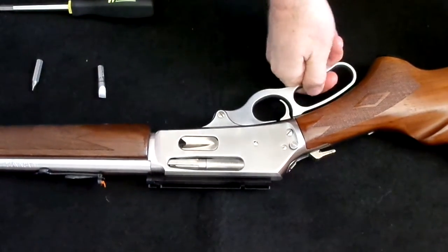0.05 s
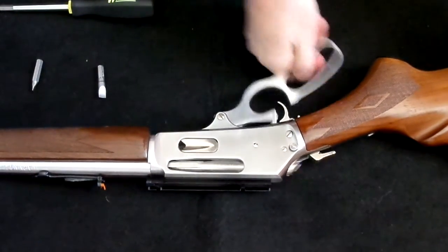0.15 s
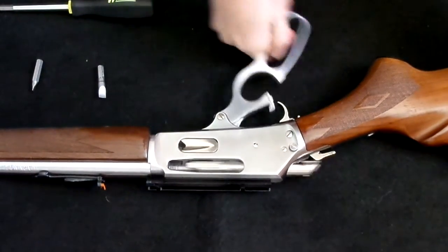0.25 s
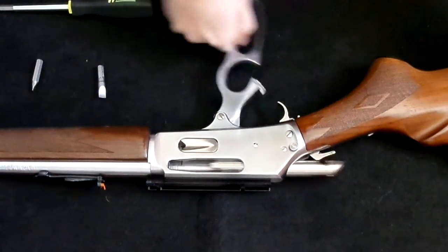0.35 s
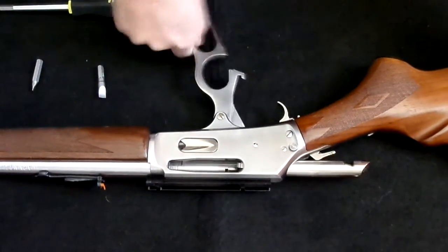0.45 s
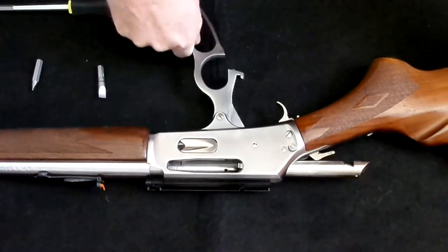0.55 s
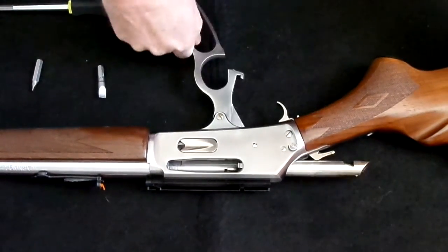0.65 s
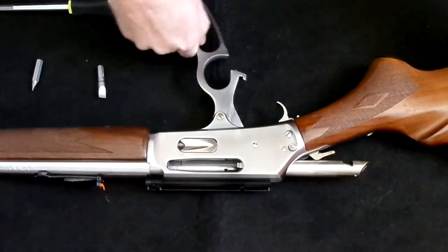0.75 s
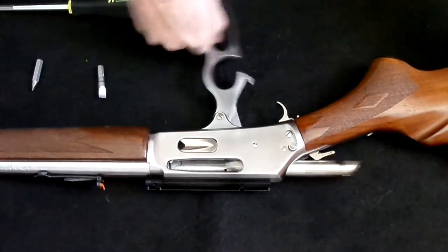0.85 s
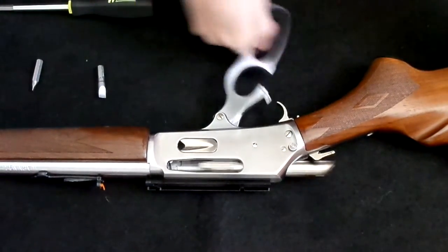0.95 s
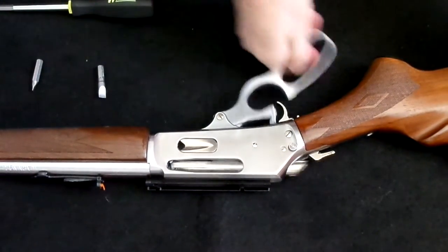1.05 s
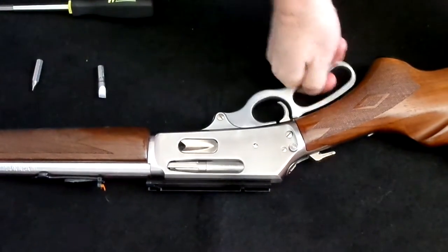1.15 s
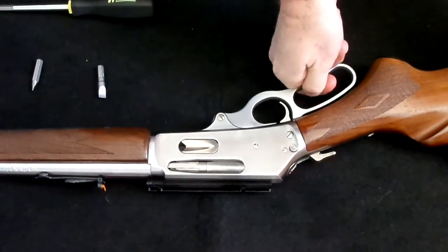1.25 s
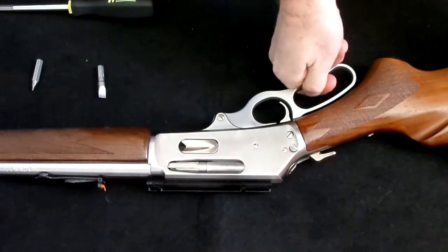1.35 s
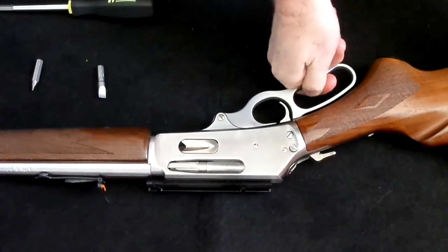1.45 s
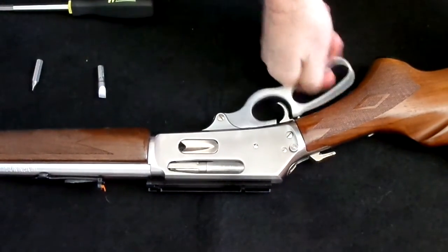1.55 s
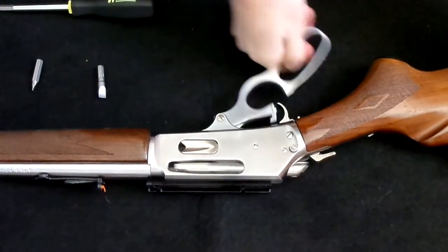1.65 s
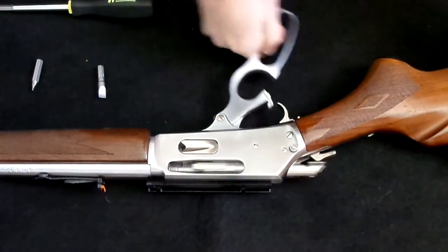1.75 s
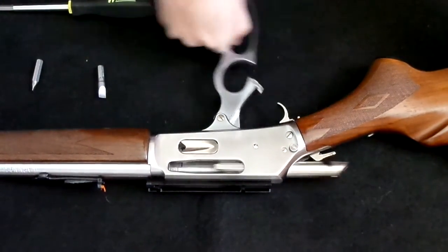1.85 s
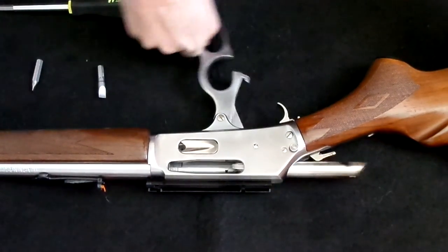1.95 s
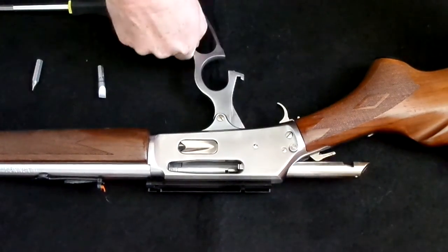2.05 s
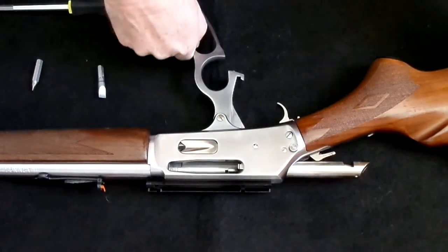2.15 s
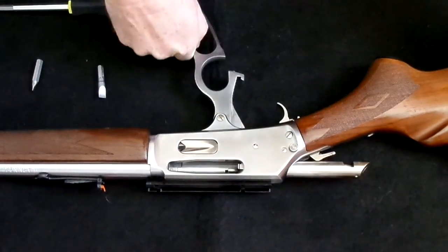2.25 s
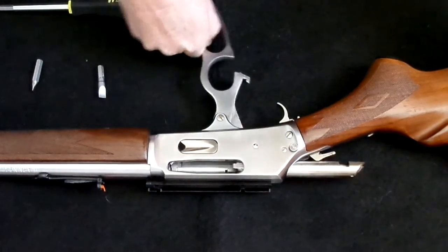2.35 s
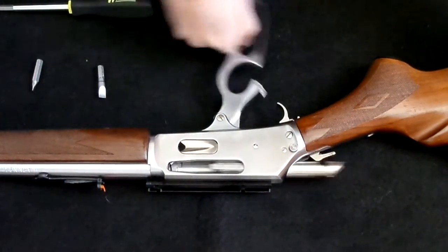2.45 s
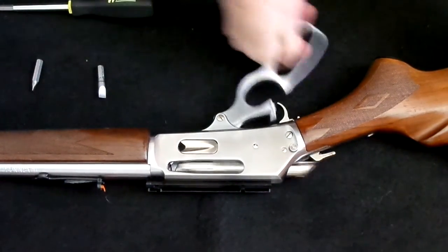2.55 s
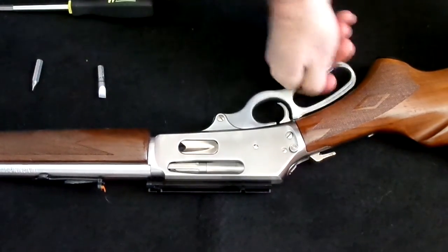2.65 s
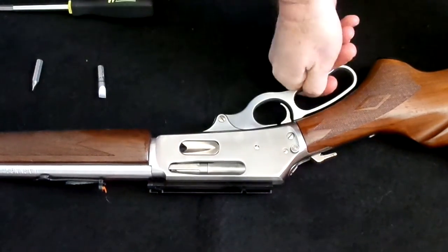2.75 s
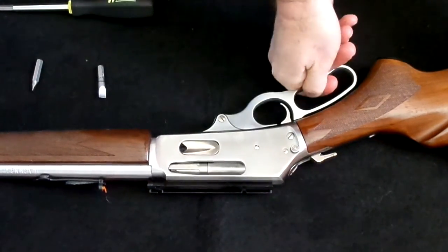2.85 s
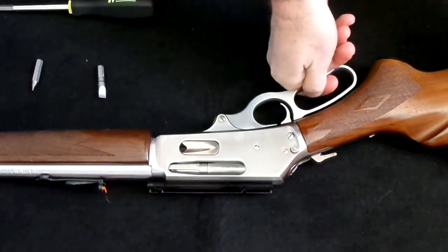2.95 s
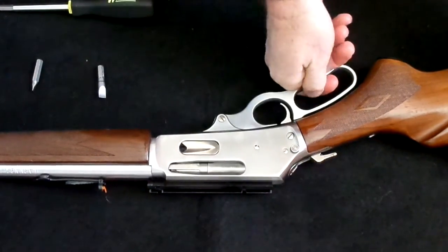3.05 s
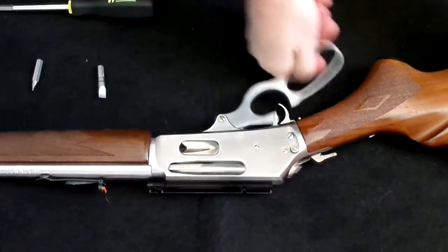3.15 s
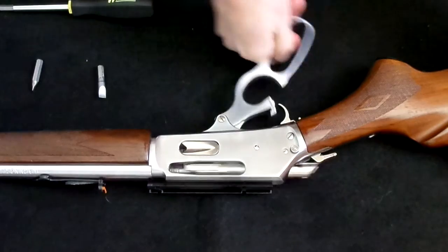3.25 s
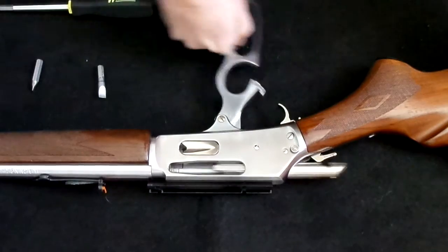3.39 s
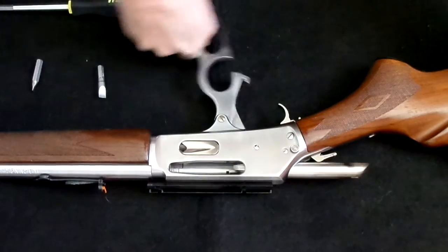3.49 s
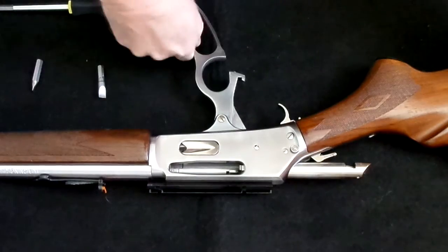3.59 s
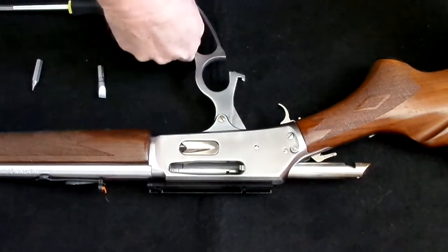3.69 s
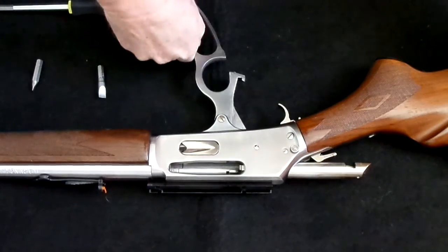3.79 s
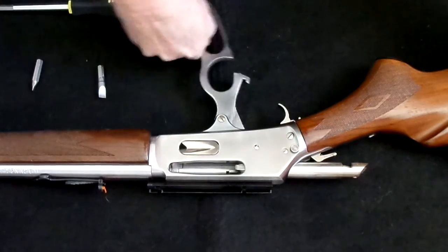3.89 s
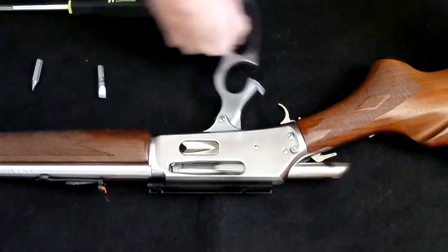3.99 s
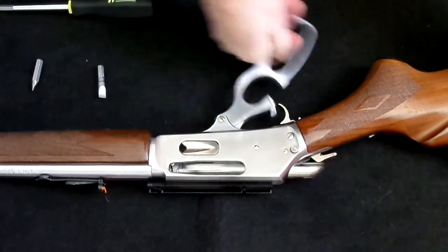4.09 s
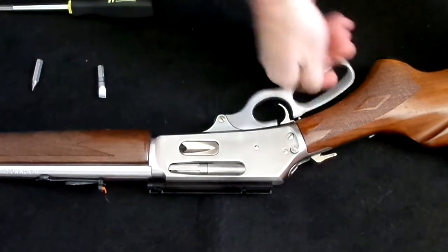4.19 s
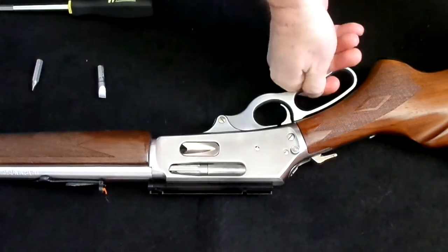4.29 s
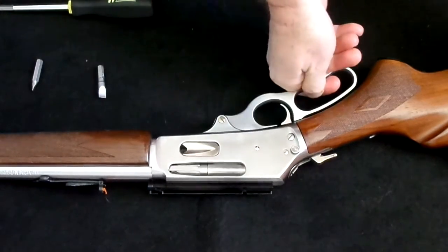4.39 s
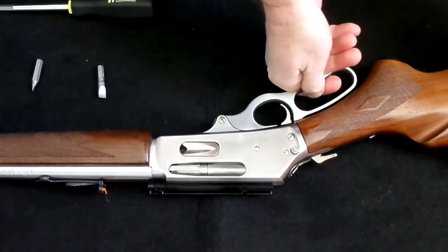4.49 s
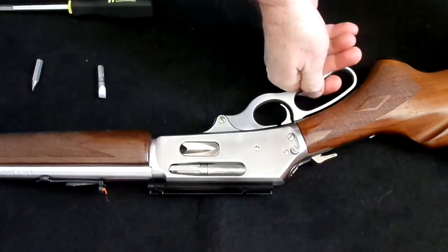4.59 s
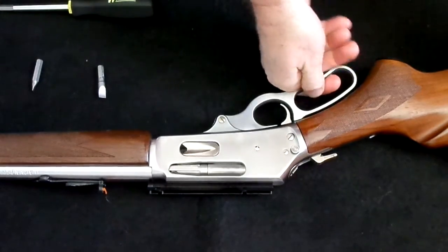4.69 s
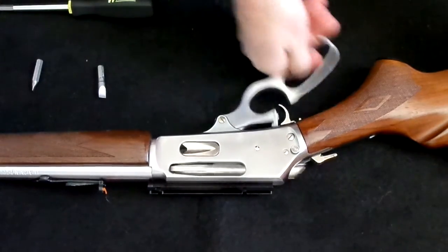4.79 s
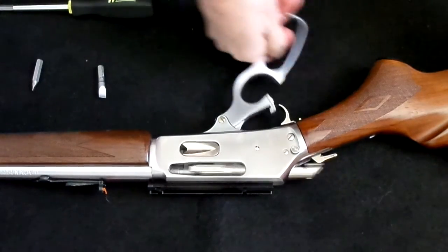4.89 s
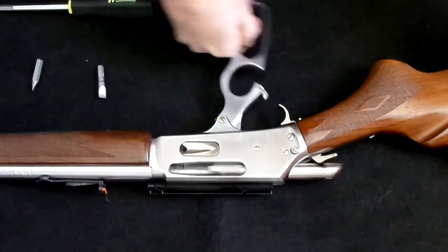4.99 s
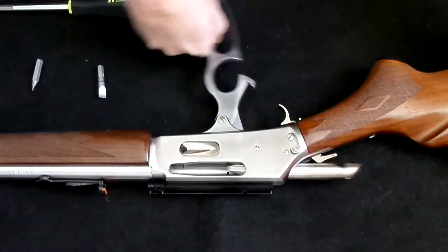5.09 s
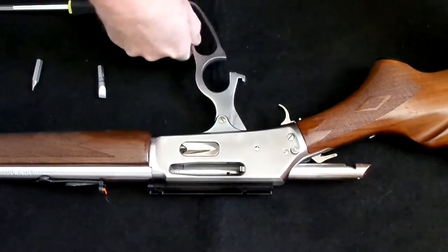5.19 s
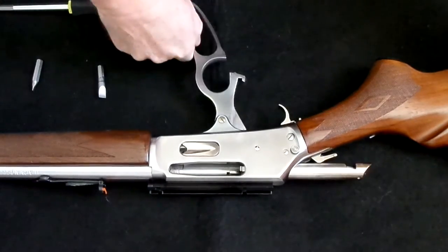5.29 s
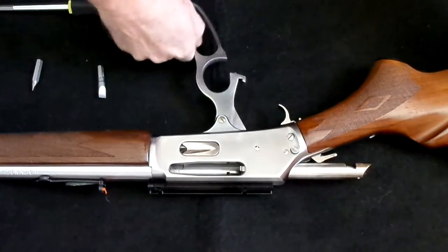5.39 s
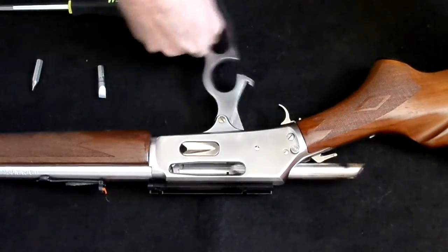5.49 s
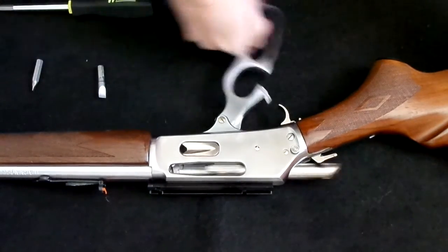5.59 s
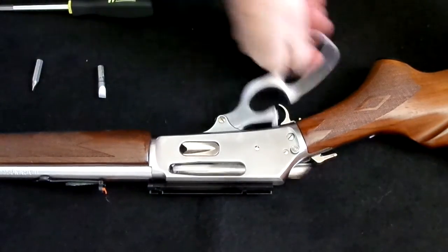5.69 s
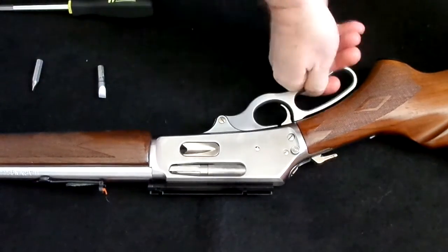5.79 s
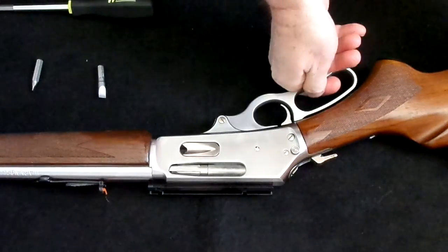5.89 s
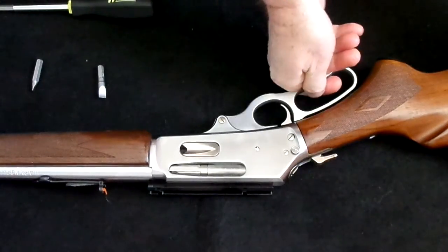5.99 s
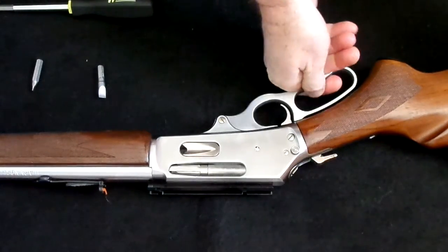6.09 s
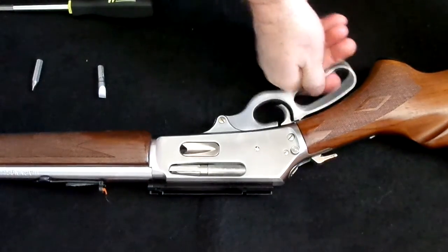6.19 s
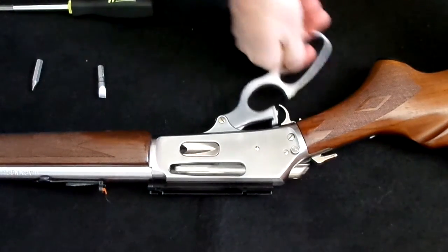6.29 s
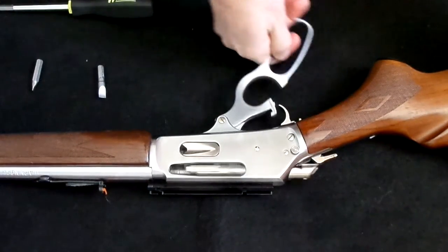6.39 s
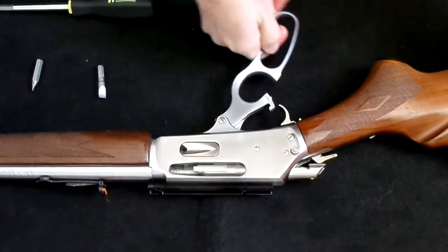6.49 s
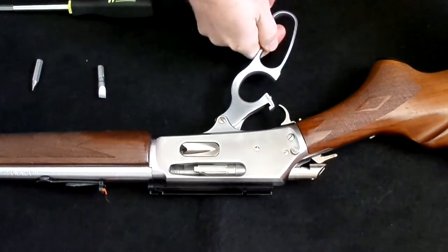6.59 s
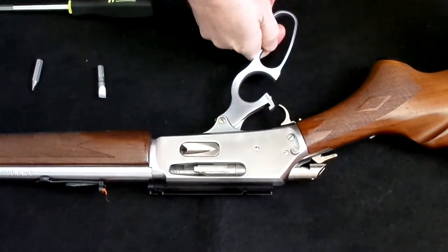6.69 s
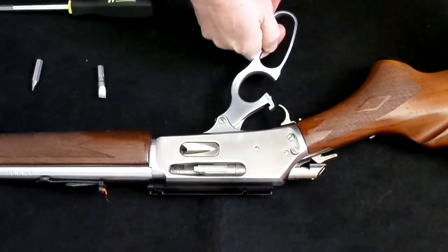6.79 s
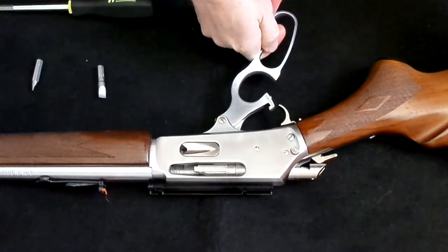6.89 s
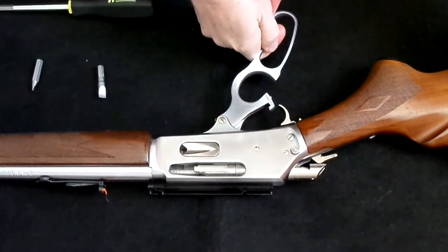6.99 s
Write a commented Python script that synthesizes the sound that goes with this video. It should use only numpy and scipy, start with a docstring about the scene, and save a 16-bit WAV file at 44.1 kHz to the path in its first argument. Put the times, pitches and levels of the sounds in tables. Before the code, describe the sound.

A lever-action rifle is cycled by hand four times, close up: sharp metallic clicks, sliding steel, hard clacks open and shut, then a gentler half-opening.

```python
"""Lever-action rifle on a padded bench, close microphone

In a small room with a faint hum, a hand cycles the action four times, then half opens it, close to the microphone.
Opening: the lever unlatches, the carrier drops, the bolt cocks and rides over the hammer and slams into its stop.
Closing: the carrier lifts, the bolt scrapes and rattles forward, and the lever latches.
Contacts are coloured noise bursts, ringing parts are clusters of decaying modes, and friction is a grain of small
slips. Random echoes make the room; gain control ducks everything after the hardest blows and recovers slowly."""
import sys
import numpy as np
from scipy import signal
from scipy.fft import rfft, irfft
from scipy.io import wavfile
from scipy.ndimage import uniform_filter1d

SR = 44100
rng = np.random.default_rng(int(sys.argv[2]) if len(sys.argv) > 2 else 0)


def to_wav(s):
    """Save 16-bit WAV."""
    ch = np.atleast_2d(s).T  # columns
    pcm = np.round(np.clip(ch, -1, 1) * 32767)  # PCM
    wavfile.write(sys.argv[1], SR, pcm.astype(np.int16))


N = 310508

# steady air of the room: (frequency [Hz], relative density [dB per Hz])
AIR = [(15, -38), (30, -31), (60, -19.5), (120, -10.5), (180, -4), (250, -7), (310, -13.5), (380, -9),
       (600, -13.5), (780, -13.5), (1850, -20), (6000, -25.5), (12200, -26), (15500, -29)]
AIR_DB = -57.16
# faint hum: (frequency [Hz], level [dB])
HUM = [(177.6, -74), (226.1, -68.5), (303, -69.5), (452.2, -76), (608.3, -73)]
# decay of the room's echoes: (frequency [Hz], time to fall 60 dB [s])
ROOM_T60 = [(250, 0.1), (700, 0.33), (1800, 0.28), (4600, 0.2751), (9000, 0.25), (15000, 0.18)]
# strength of the room's echoes: (frequency [Hz], level [dB])
ROOM_DB = [(200, 10.5), (600, 0.5), (1800, -2.5), (4000, -6), (9000, -8.5), (15000, -9)]
EDGE_HZ = 16000  # upper edge of the band

# colour of sliding steel: (frequency [Hz], level [dB])
SCRAPE = [(100, -35), (280, -5.5), (420, -18), (700, -15), (1100, -2.5), (2000, 4.5), (3100, -22),
          (3900, -4), (5200, -7), (7000, -16), (11000, -21), (16000, -34)]
# colour of the stock's thrum under the hand: (frequency [Hz], level [dB])
THRUM_RING = [(40, -26), (65, -11), (130, -9.5), (225, -3.5), (260, -0.5), (305, 2.5), (380, -17),
              (510, -2.5), (800, -28.5), (3000, -43)]
# opening strokes, from the unlatching: (end [s], friction [dB], thrum [dB], easing of the hand by the end [dB])
OPENINGS = [(0.44, -49, -65, -8), (1.965, -44, -55.5, -12), (3.49, -54, -57.5, -5.5),
            (5.13, -52.5, -54.5, -6.5), (6.48, -57, -52, -26)]
# the pull builds from the unlatching, peaks as the carrier drops, then settles
PULL_START_DB, SETTLE_S, SETTLED_DB = -1, .11, -3.5
# the bolt's passage in each closing stroke: (first knock [s], halfway [s], last knock [s])
CLOSINGS = [(0.955, 1.054, 1.1315), (2.489, 2.5765, 2.637), (4.041, 4.132, 4.192), (5.602, 5.687, 5.739)]
# a faster bolt knocks harder: force when its second half takes SWIFT_S, and rise per doubling of speed
FORCE_DB, SPEED_DB, SWIFT_S = -22, 7.5, .06
# closing friction and thrum above the stroke's force: (first knock [dB], halfway [dB], latch [dB])
PUSH_FRICTION_DB, PUSH_THRUM_DB = (-26.5, -25, -24), (-31, -33, -34)
# friction while the slack is taken up, starting this long before its click
SLACK_FRICTION_DB, SLACK_LEAD_S = -58, .02
# thrum while the slack is taken up; thrum after a blow at either end of the travel, and when it is gone
SLACK_THRUM_DB, END_THRUM_DB, END_THRUM_S = -61.5, -56, .078
# the hand's pressure comes and goes, from and to a resting level
GRIP_S, RELEASE_S, REST_DB = .016, .047, -96

# clusters of receiver and stock: (frequency [Hz], width [Hz], level [dB], time to fall 60 dB [s])
FRAME_MODES = [(279, 65, -36.5, 0.18), (527, 40, -32.5, 0.095), (1010, 240, -25, 0.091),
               (1430, 300, -17.5, 0.068), (2058, 120, -17, 0.1), (3126, 43, -18, 0.058),
               (5340, 320, -29.5, 0.064)]
# clusters of the lifted carrier: (frequency [Hz], width [Hz], level [dB], time to fall 60 dB [s])
CARRIER_MODES = [(2270, 280, -20, 0.2), (4560, 300, -11, 0.057)]
KICK_DB = -15  # every lift feeds the carrier equally
# clusters of the dropped carrier: (frequency [Hz], width [Hz], level [dB], time to fall 60 dB [s])
DROPPED_MODES = [(2240, 200, -9, 0.043), (4550, 190, -21, 0.2)]

# the lever leaves its latch: (time [s], level [dB], brightness [dB per octave])
UNLATCH = [(0.059, -22, 4), (1.542, -24.5, 2.5), (3.089, -23, -1.5), (4.711, -18.5, 2), (6.186, -19, 4.5)]
# knocks from unlatching to carrier drop: (share of the way, level above the drop [dB], brightness [dB per octave])
UNLOCK_TRACK = [(.58, -6, 3.5), (.8, -11.5, 4.5)]
# the carrier drops onto its first edge: (time [s], level [dB], brightness [dB per octave], freedom to ring [dB])
DROP = [(0.100, -27.5, 2, 9), (1.588, -30, 1, -16), (3.133, -29, 1.5, 0), (4.751, -23, 4, -5),
        (6.224, -22, 4.5, -2)]
# the carrier's second edge: (delay [s], change of level [dB], change of brightness [dB per octave])
SECOND_EDGE = (.0048, 1, -2.8)
# the carrier bounces to rest: first flight, share kept by each next one, first loss and further losses
FLIGHT_S, FLIGHT_KEPT, LANDING_DB, BOUNCE_DB = .037, .75, -15.5, -5
# the bolt meets the hammer and starts to push it back: (time [s], level [dB], brightness [dB per octave])
MEET = [(0.2, -38, -3.5), (1.7, -40, -4), (3.247, -38.5, -1.5), (4.859, -42, -1), (6.381, -49.5, -1)]
# the hammer clicks back to full cock: (time [s], level [dB], brightness [dB per octave])
COCK = [(0.238, -25.5, 0.96), (1.744, -28.5, -0.74), (3.288, -26, -0.14), (4.9, -27, 0.13),
        (6.483, -41.5, -0.34)]
# the bolt rides over the hammer: (time [s], level [dB], brightness [dB per octave])
RIDE = [(0.324, -29.5, 0.45), (1.84, -28.5, 0.27), (3.383, -28.5, 0.57), (5.009, -29.5, -0.4)]
# a light spring ticks just before the end of the travel: (time [s], level [dB], brightness [dB per octave])
TICK = [(0.422, -29, 9.3), (1.943, -29.5, 5.6), (3.473, -31, 5.4), (5.109, -32.5, 4.3)]
# the spring flicks back: (delay [s], change of level [dB], change of brightness [dB per octave])
FLICK = (.0075, -6, -3)
# lever and bolt hit the open stop, one just after the other: (time [s], level [dB], brightness [dB per octave])
STOP = [(0.439, -15.5, 0.02), (0.446, -18, -2.6), (1.967, -16.5, 0.6), (1.976, -11.5, 0.25),
        (3.4906, -19.5, -1), (3.4987, -11, 3.3), (5.129, -15, 1.1), (5.137, -12, 1.2)]
# the lever takes up its slack: (time [s], level [dB], brightness [dB per octave])
SLACK = [(0.730, -35.5, -0.5), (2.291, -31.5, -1.3), (3.844, -30, 0), (5.412, -37.5, -1.5)]
# the lever kicks the carrier up: (time [s], level [dB], brightness [dB per octave])
LIFT = [(0.793, -20.5, 2.5), (2.341, -19, 0.8), (3.894, -17.5, 4), (5.462, -15.5, 2.5)]
# the lever rebounds from slack or lift: (delay [s], change of level [dB], change of brightness [dB per octave])
REBOUND = (.0125, -14, 1.5)
# rough spots of closing: (share of the travel, level above the stroke's force [dB], brightness [dB per octave])
CLOSING_TRACK = [(0, -4.5, 1.8), (.175, -7.5, 0.5), (.263, -4, -1), (.4, -8, 3), (.5, 0.5, 2),
                 (.525, -5, 3), (.735, -9, 4), (.765, 0, 4)]
# three quick ticks as the bolt wedges into its lock:
# (share of the travel, level above the stroke's force [dB], brightness [dB per octave])
LOCK_TRACK = [(.935, -2, 5), (.972, -1.5, 6.5), (1, -2, 4.5)]
# the lever snaps shut: (time [s], level [dB], brightness [dB per octave])
LATCH = [(1.156, -22, -0.2), (2.655, -17, -0.69), (4.222, -19.5, 0.81), (5.778, -19, -0.055)]

# ring of the unlatching: (frequency [Hz], level [dB])
UNLATCH_RING = [(100, -66), (300, -31), (900, -13), (2100, -4), (3000, 3), (5500, 9), (7500, 3),
                (9700, 10.5), (11500, 2.5), (14000, 2), (16000, -2)]
# ring of the dropped carrier: (frequency [Hz], level [dB])
DROP_RING = [(100, -28.5), (300, -19), (700, -14), (1100, -3), (2100, -2.5), (3200, 0.5), (4000, -9),
             (4800, -3.5), (7000, -11), (11500, -14), (16000, -27)]
# ring of the hammer at full cock: (frequency [Hz], level [dB])
COCK_RING = [(100, -25), (300, -25.5), (1100, -1), (2200, -4.5), (4000, -5), (5200, -0.5), (6200, 1.5),
             (6900, -19), (7700, -2), (9600, -11.5), (10800, -5), (12000, -14.5), (13200, -15.5),
             (16000, -24)]
# ring of bolt over hammer: (frequency [Hz], level [dB])
RIDE_RING = [(100, -53), (300, -29), (1100, -1.5), (2100, -1.5), (3100, 0.5), (5000, -7.5), (7500, -6),
             (9800, 0), (12200, -5.5), (13400, -7.5), (16000, -15.5)]
# ring of the spring: (frequency [Hz], level [dB])
TICK_RING = [(100, -39), (300, -41), (2200, 4), (4000, -5), (5300, -4), (6200, -13), (7800, 0), (8900, -26),
             (10100, 5), (12800, -19), (14700, 0), (16000, 3.5)]
# ring of the open stop: (frequency [Hz], level [dB])
STOP_RING = [(100, -36), (300, -27), (700, -13), (1200, -3), (2100, 0), (3000, -1.5), (3800, -4), (5500, 0),
             (7300, -3), (8200, 2.5), (9200, -0.5), (12700, 0.5), (16000, -4)]
# ring of the lever on slack or carrier: (frequency [Hz], level [dB])
LIFT_RING = [(100, -30.5), (300, -26), (800, -13.5), (1500, -7), (2150, 2), (2800, -7), (3500, -5.5),
             (4000, -12), (4550, -8.5), (6000, -15), (10500, -13), (13000, -23.5), (15300, -19)]
# ring of the sliding bolt: (frequency [Hz], level [dB])
RATTLE_RING = [(100, -21.5), (280, -12.5), (400, -27), (700, -9.5), (1100, -3), (2100, 0), (3000, 0.5),
               (3900, -8.5), (5300, -4.5), (7000, -12.5), (8300, -10.5), (12000, -18.5), (14000, -20.5),
               (16000, -28)]
# ring of the closing latch: (frequency [Hz], level [dB])
LATCH_RING = [(100, -29), (300, -36.5), (1100, -2.5), (2100, -9), (3600, -4), (4600, -10), (5300, 2.5),
              (6500, -5.5), (10000, -6), (14000, -4), (16000, -11)]


def amp(db):
    """Decibels to gain."""
    return 10 ** (np.asarray(db) / 20)


def unit(x):
    """Scales to an energy of one."""
    return x / np.sqrt(np.sum(x ** 2) + 1e-20)


def read(points, hz):
    """Reads a table on a logarithmic frequency axis."""
    f, value = np.transpose(points)
    return np.interp(np.log(hz + 1), np.log(f + 1), value)


def air():
    """Steady room noise of fixed colour, with faint hum tones whose phases wander."""
    t = np.arange(N) / SR
    spectrum = rfft(rng.standard_normal(N)) * amp(read(AIR, np.fft.rfftfreq(N, 1 / SR)))
    out = amp(AIR_DB) * np.sqrt(N) * unit(irfft(spectrum, N))
    for hz, db in HUM:
        drift = np.cumsum(rng.standard_normal(N)) * 0.0209  # radians
        out += amp(db) * np.sqrt(2) * np.sin(2 * np.pi * hz * t + drift)
    return out


def room(x, full_s=0.0026, build_s=0.0016, size=24000):
    """Dense echoes from bench and walls, each band dying at its own speed."""
    t = np.arange(size) / SR
    taps = rng.standard_normal(size) * (rng.random(size) < .2)
    hz, when, bands = signal.stft(taps, SR, nperseg=256)
    t60 = read(ROOM_T60, hz)[:, None]
    decay = amp(read(ROOM_DB, hz)[:, None] - 60 * when / t60)
    even_energy = np.sqrt(np.log(1e6) / (t60 * SR))  # long decays get no extra energy
    tail = signal.istft(bands * decay * even_energy, SR, nperseg=256)[1][:size] / taps.std()
    tail *= np.clip((t - full_s) / build_s + 1, 0, 1)
    return signal.oaconvolve(x, tail)[:N]


def colour(points, tilt_db=0, size=2048):
    """Causal (minimum-phase) impulse response with the given spectrum, tilted by dB per octave around 4 kHz."""
    hz = abs(np.fft.fftfreq(size, 1 / SR))
    octaves = np.log2(np.clip(hz, 1500, 12000) / 4000)
    beyond_edge_db = 40 * np.clip(hz / EDGE_HZ - 1, 0, 1)
    log_gain = np.log(amp(read(points, hz) + tilt_db * octaves - beyond_edge_db))
    response = np.fft.ifft(np.exp(np.conj(signal.hilbert(log_gain)))).real
    return unit(response[:size // 2])


def scrape(strokes, ring, tilt_db, slips_per_s, spread_db, smooth, slip_s=0.0012):
    """Sliding: small slips of uneven size over a fine hiss."""
    level = np.zeros(N)
    for stroke in strokes:
        s, db = np.transpose(stroke)
        level += np.interp(np.arange(N) / SR, s, amp(db), left=0, right=0)
    slip_power = amp(spread_db * np.minimum(rng.exponential(1, N), 3)) ** 2
    slips = (rng.random(N) < slips_per_s / SR) * slip_power
    power = signal.lfilter([1], [1, -np.exp(-1 / (slip_s * SR))], slips)
    grain = np.sqrt(power / power.mean() + smooth) * rng.standard_normal(N)
    return signal.oaconvolve(grain * uniform_filter1d(level, size=200), colour(ring, tilt_db))[:N]


def pressed(times, levels_db):
    """One press of the hand as (time [s], level [dB]) points, with its grip and release."""
    return [(times[0] - GRIP_S, REST_DB), *zip(times, levels_db), (times[-1] + RELEASE_S, REST_DB)]


def pulls():
    """Opening: the hand pulls hardest as the carrier drops, then eases. Returns (friction, thrum) strokes."""
    friction, thrum = [], []
    for (start, _, _), (drop, *_), (end, friction_db, thrum_db, ease_db) in zip(UNLATCH, DROP, OPENINGS):
        times = (start, drop, drop + SETTLE_S, end)
        effort_db = np.array([PULL_START_DB, 0, SETTLED_DB + ease_db / 2, SETTLED_DB + ease_db])
        friction.append(pressed(times, friction_db + effort_db))
        thrum.append(pressed(times, thrum_db + effort_db))
    return friction, thrum


def force(passage):
    """Force of a closing stroke in dB, from the speed of the bolt over its second half."""
    _, halfway, last = passage
    return FORCE_DB + SPEED_DB * np.log2(SWIFT_S / (last - halfway))


def pushes():
    """Closing: the hand takes up the slack, then drives the bolt home. Returns (friction, thrum) strokes."""
    friction, thrum = [], []
    for (slack, _, _), (lift, _, _), passage, (latch, _, _) in zip(SLACK, LIFT, CLOSINGS, LATCH):
        friction.append(pressed((slack - SLACK_LEAD_S, lift), (SLACK_FRICTION_DB, SLACK_FRICTION_DB)))
        thrum.append(pressed((slack, lift), (SLACK_THRUM_DB, SLACK_THRUM_DB)))
        times = (*passage[:2], latch)
        friction.append(pressed(times, np.add(force(passage), PUSH_FRICTION_DB)))
        thrum.append(pressed(times, np.add(force(passage), PUSH_THRUM_DB)))
    return friction, thrum


def jolts():
    """The stock shudders when the lever latches and at the second blow of each open stop."""
    ends = STOP[1::2] + LATCH
    return [[(s, REST_DB), (s + GRIP_S, END_THRUM_DB), (s + END_THRUM_S, REST_DB)] for s, _, _ in ends]


def sliding():
    """Friction of steel on steel, and the low thrum of the stock under the hand."""
    (opening, pull_thrum), (closing, push_thrum) = pulls(), pushes()
    thrum = pull_thrum + push_thrum + jolts()
    out = scrape(opening, SCRAPE, tilt_db=2.5, slips_per_s=260, spread_db=11, smooth=0.15)
    out += scrape(closing, SCRAPE, tilt_db=2, slips_per_s=200, spread_db=7, smooth=0.29)
    out += scrape(thrum, THRUM_RING, tilt_db=0, slips_per_s=70, spread_db=3, smooth=.15, slip_s=.006)
    return out


def ringing(rows, modes):
    """Each blow feeds clusters of close modes, which beat against each other as they die away."""
    fed, out, f = np.zeros(N), np.zeros(N), np.fft.rfftfreq(N, 1 / SR)
    for s, db, *_ in rows:
        fed[round(s * SR)] += amp(db) ** 2
    for hz, width, db, t60 in modes:
        energy = signal.lfilter([1], [1, -np.exp(-np.log(1e6) / (t60 * SR))], fed)
        lag = np.exp(-hz / (2 * SR))  # a mode takes a couple of cycles to build up
        envelope = signal.lfilter([1 - lag], [1, -lag], np.sqrt(energy))
        cluster = irfft(rfft(rng.standard_normal(N)) * np.exp(-2 * ((f - hz) / width) ** 2), N)
        out += amp(db) * envelope * np.sqrt(N) * unit(cluster)
    return out


def add(mix, s, sound):
    """Mixes a sound in at time s."""
    part = mix[max(round(s * SR), 0):][:len(sound)]
    part += sound[:len(part)]


def flattened(x, size=64):
    """Evens out the broad colour of a burst and keeps its fine resonances."""
    z = rfft(x, 2 * len(x))
    broad = np.sqrt(uniform_filter1d(abs(z) ** 2, size) + 1e-12)
    return unit(irfft(z / broad)[:len(x)])


def blows(rows, ring, hold, decay, rise=.001, uneven_db=2.2, size=1400):
    """Steel on steel: a dense ring swells, holds and drains. Returns (towards the microphone, into the room)."""
    alike = .35  # a part rings somewhat alike each time
    t, direct, radiated = np.arange(size) / SR, np.zeros(N), np.zeros(N)
    swell = 1 - np.exp(-(t / rise) ** 2)
    shape = swell * (np.exp(-np.maximum(t - hold, 0) / decay) + .13 * np.exp(-t / .009))
    own = rng.standard_normal(size)
    ring_hz, ring_db = np.transpose(ring)
    for (s, db, bright_db), (fresh, spot) in zip(rows, rng.standard_normal((len(rows), 2, size))):
        burst = flattened(shape * (alike * own + np.sqrt(1 - alike ** 2) * fresh))
        # each spot favours other resonances
        spot_db = ring_db + uneven_db * spot[:len(ring)]
        body = colour(np.c_[ring_hz, spot_db], bright_db)
        # summed over all directions, the fine peaks even out
        even_db = np.minimum(spot_db, uniform_filter1d(spot_db, size=3) + 1)
        all_round = colour(np.c_[ring_hz, even_db], bright_db)
        strength = amp(db) * np.sqrt(.004 * SR)  # energy of 4 ms at this level
        add(direct, s - rise / 2, strength * unit(signal.fftconvolve(burst, body)))
        add(radiated, s + hold / 2, strength * all_round)
    return direct, radiated


def after(rows, delay, change_db, brighter_db):
    """A second contact that follows each blow."""
    return [(s + delay, db + change_db, bright_db + brighter_db) for s, db, bright_db in rows]


def softer(rows, change_db):
    """The same blows at another strength."""
    return [(s, db + change_db, bright_db) for s, db, bright_db in rows]


def chatter(rows, late, drop_db, spread_db):
    """A loose part grazes its track twice, at random, after each knock."""
    chance = rng.random((len(rows), 2, 2))
    return [(s + late * when, db - drop_db - spread_db * weak, bright_db)
            for (s, db, bright_db), grazes in zip(rows, chance)
            for when, weak in grazes]


def bounces(rows, count=3):
    """Each flight of the carrier is shorter than the last, and each landing softer."""
    flights = np.cumsum(FLIGHT_S * FLIGHT_KEPT ** np.arange(count))
    return [(s + flight, db + LANDING_DB + k * BOUNCE_DB, 0)
            for s, db, _ in rows
            for k, flight in enumerate(flights)]


def knocks(track, times, force_db):
    """The bolt passes evenly spaced marks at the given times and knocks on each rough spot of its track."""
    marks = np.linspace(0, 1, len(times))
    return [(np.interp(place, marks, times), force_db + db, bright_db) for place, db, bright_db in track]


def closing_knocks(track):
    """The knocks of one stretch of track, in every closing stroke."""
    return [row for passage in CLOSINGS for row in knocks(track, passage, force(passage))]


def rattle():
    """Knocks of the sliding bolt, opening and closing, apart from its lock."""
    unlocking = [row for (unlatch, _, _), (drop, drop_db, *_) in zip(UNLATCH, DROP)
                 for row in knocks(UNLOCK_TRACK, (unlatch, drop), drop_db)]
    return unlocking + MEET + closing_knocks(CLOSING_TRACK)


def opening_contacts(drops):
    """Lever, carrier, hammer, spring and stop, each with its own length of ring [s]."""
    stop_grazes = chatter(STOP, late=.018, drop_db=12, spread_db=6)
    return [
        blows(UNLATCH, UNLATCH_RING, hold=.002, decay=.0018, rise=.0008),
        blows(drops, DROP_RING, hold=.0024, decay=.0028, rise=.0012),
        blows(COCK, COCK_RING, hold=.002, decay=.0015, rise=.0007),
        blows(RIDE, RIDE_RING, hold=.0018, decay=.0025),
        blows(TICK + after(TICK, *FLICK), TICK_RING, hold=.0014, decay=.0016, rise=.0006),
        blows(STOP, STOP_RING, hold=.003, decay=.0018, rise=.0012),
        blows(stop_grazes, STOP_RING, hold=.0015, decay=.0015, rise=.0007),
    ]


def closing_contacts(slacks, lifts, locks):
    """Slack, lifted carrier, bolt lock and latch, each with its own length of ring [s]."""
    return [
        blows(slacks, LIFT_RING, hold=.004, decay=.002, rise=.002),
        blows(lifts, LIFT_RING, hold=.002, decay=.0012, rise=.0009),
        blows(locks, RATTLE_RING, hold=.0015, decay=.0008, rise=.0007, uneven_db=4),
        blows(LATCH, LATCH_RING, hold=.0026, decay=.0012),
    ]


def loose_contacts(rattles, landings):
    """The bolt rattles and grazes along its track, and the carrier bounces, in both directions of the lever."""
    grazes = chatter(rattles + UNLATCH, late=.016, drop_db=9.5, spread_db=4.0)
    return [
        blows(rattles, RATTLE_RING, hold=.0026, decay=.0018, uneven_db=3.2),
        blows(grazes, RATTLE_RING, hold=.001, decay=.0013, rise=.0006, uneven_db=3),
        blows(landings, DROP_RING, hold=.002, decay=.0015, rise=.0008),
    ]


def scene():
    """Contacts, ringing parts and friction close to the microphone, with the room around them."""
    falls = [row[:3] for row in DROP]
    drops = falls + after(falls, *SECOND_EDGE)
    slacks, lifts = SLACK + after(SLACK, *REBOUND), LIFT + after(LIFT, *REBOUND)
    rattles, locks = rattle(), closing_knocks(LOCK_TRACK)
    landings = bounces(falls) + bounces(softer(LIFT, change_db=-9.5), count=1)

    contacts = opening_contacts(drops) + closing_contacts(slacks, lifts, locks)
    contacts += loose_contacts(rattles, landings)
    direct, radiated = np.sum(contacts, axis=0)

    damped = softer(STOP + LATCH + lifts, change_db=-5.5)  # parts held hard together ring less
    body = ringing(UNLATCH + drops + COCK + RIDE + slacks + rattles + locks + damped, FRAME_MODES)
    body += ringing([(s, KICK_DB) for s, _, _ in LIFT], CARRIER_MODES)
    body += ringing([(s, db + freedom_db) for s, db, _, freedom_db in DROP], DROPPED_MODES)
    body += sliding()

    # the room hears every direction
    echoes = room(0.6 * direct + 0.9 * radiated + body)
    return (direct + body + echoes + air())[None]


def record(dry, threshold_db=-15, recovery_db_per_s=8):
    """Gain control steps down on the hardest blows and recovers slowly; then the band limit."""
    power_db = 10 * np.log10(abs(uniform_filter1d(dry[0] ** 2, size=130)) + 1e-12)
    over_db = np.maximum(power_db - threshold_db, 0)
    # each reduction is held and falls steadily until a greater one takes over
    fall_db = np.arange(N) * recovery_db_per_s / SR
    held_db = np.maximum.accumulate(over_db + fall_db) - fall_db
    ducked = dry / amp(uniform_filter1d(held_db, size=60))
    low_pass = signal.firwin(301, EDGE_HZ, window=("kaiser", 8), fs=SR)
    return signal.oaconvolve(ducked, low_pass[None], "same")


dry = scene()
out = record(dry)
to_wav(out)
```